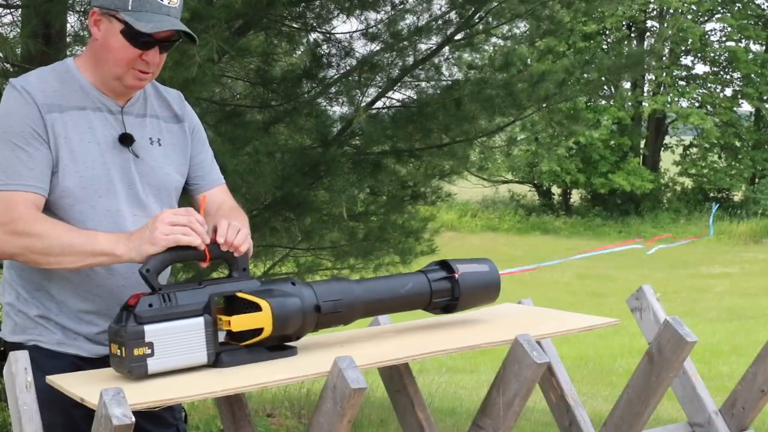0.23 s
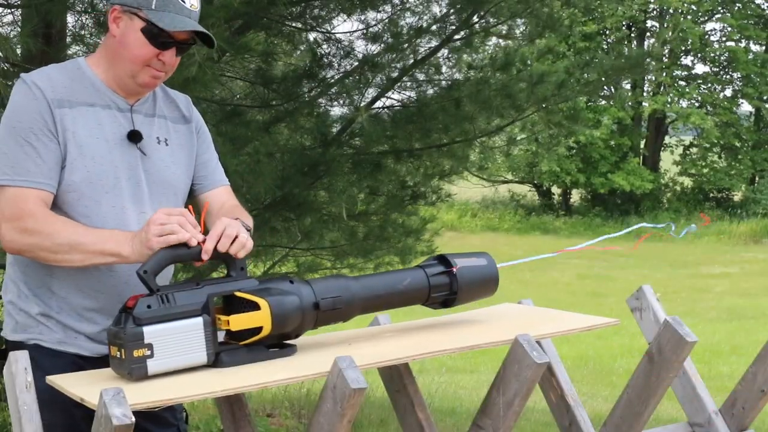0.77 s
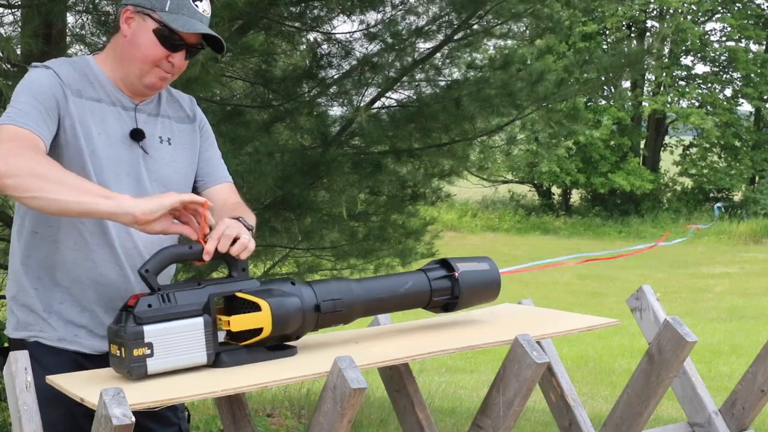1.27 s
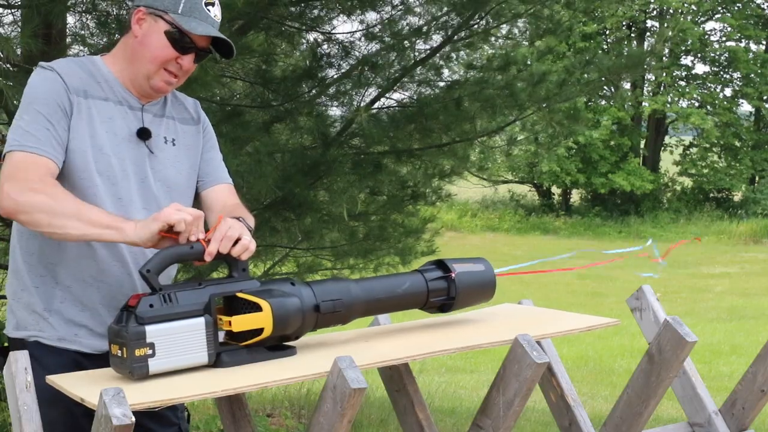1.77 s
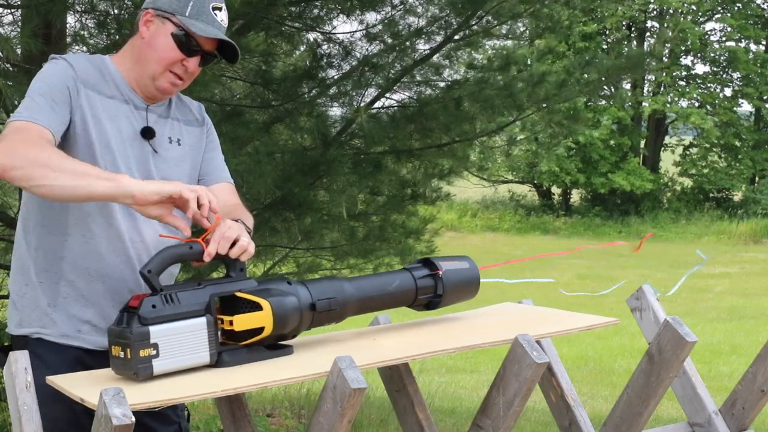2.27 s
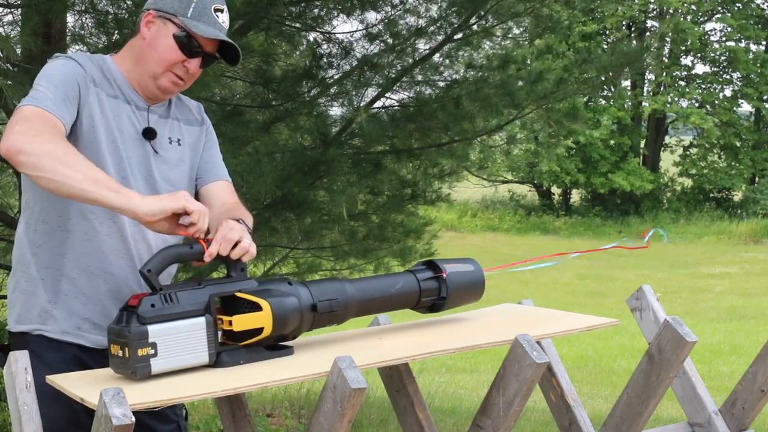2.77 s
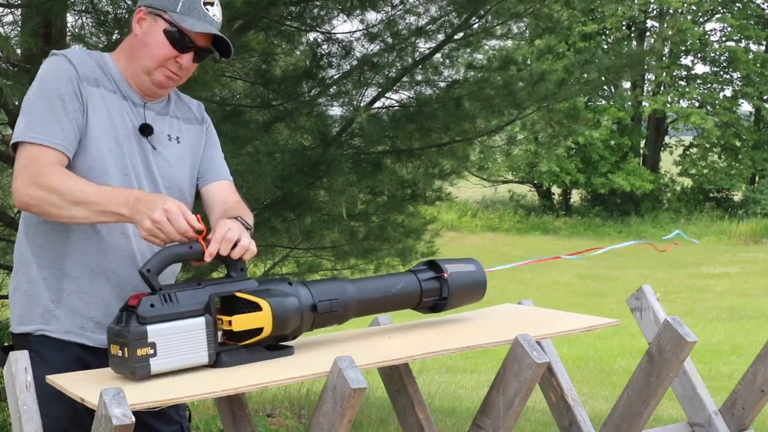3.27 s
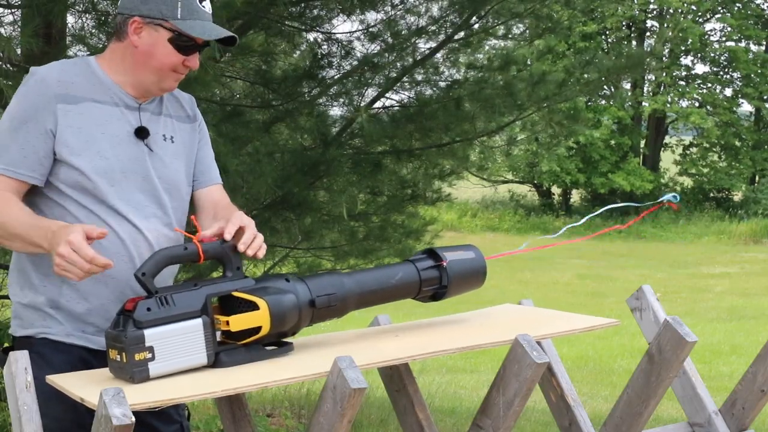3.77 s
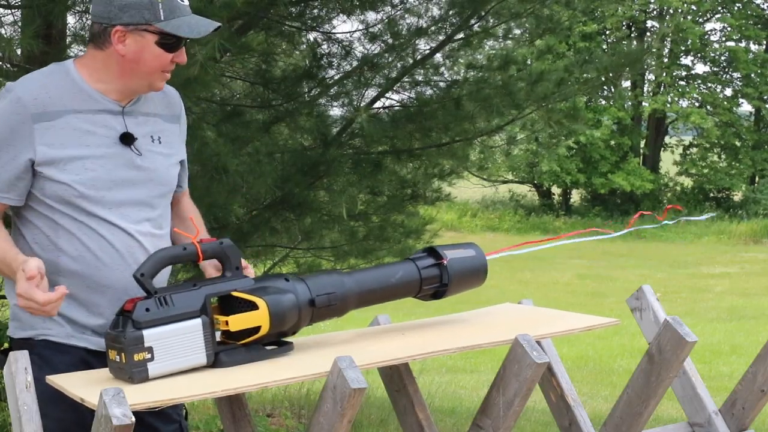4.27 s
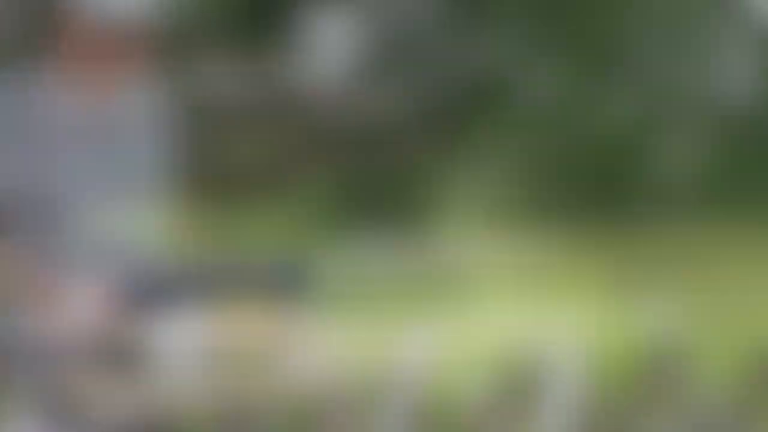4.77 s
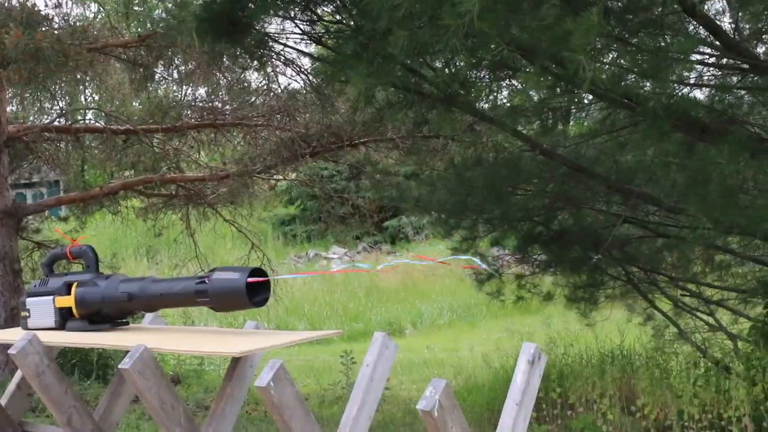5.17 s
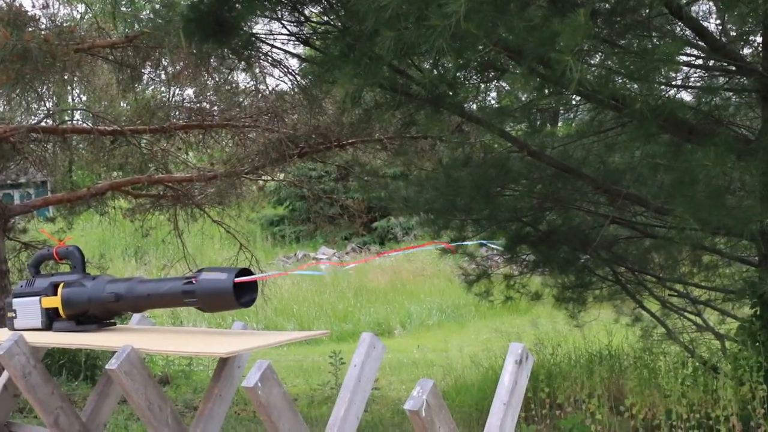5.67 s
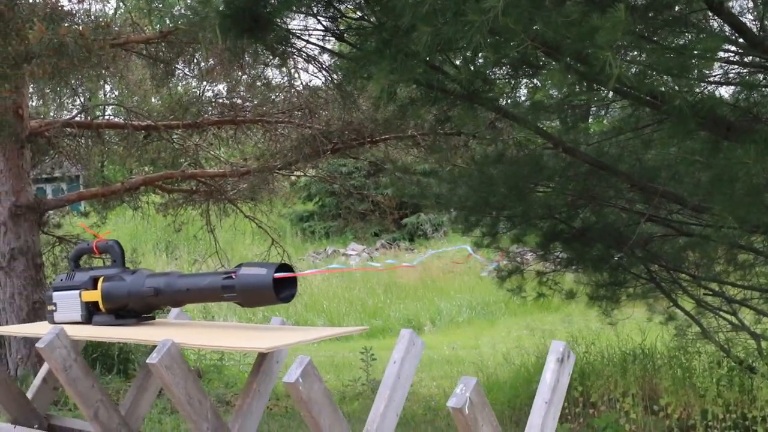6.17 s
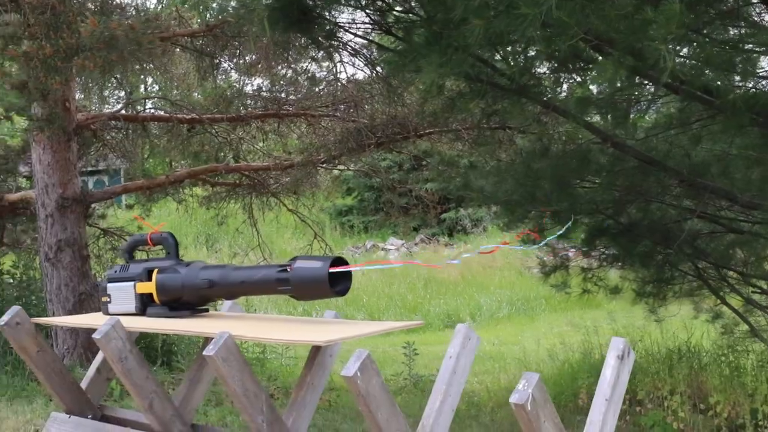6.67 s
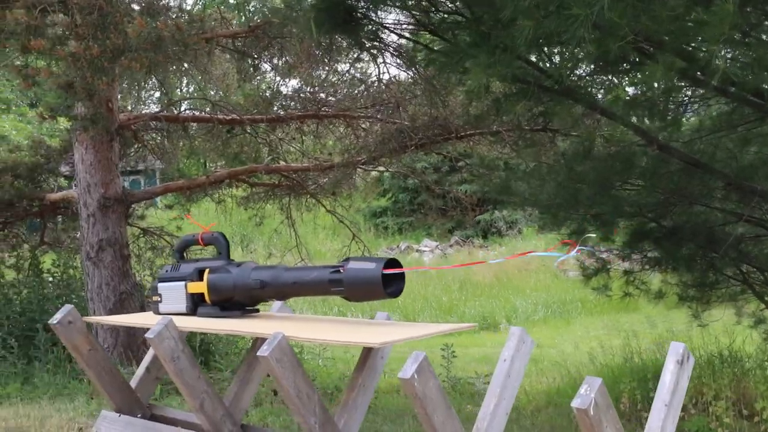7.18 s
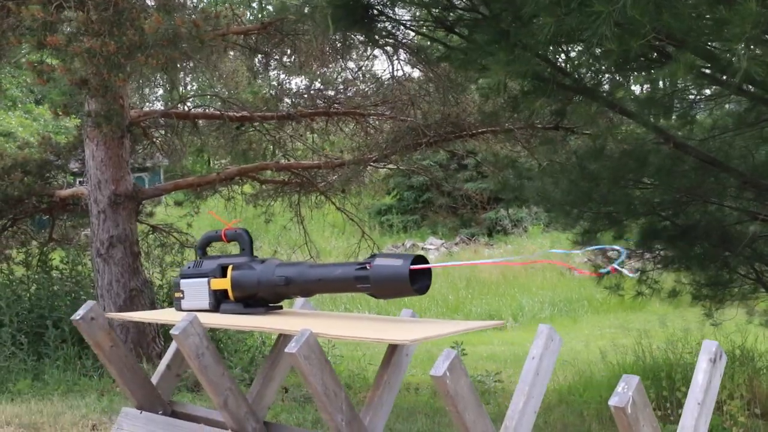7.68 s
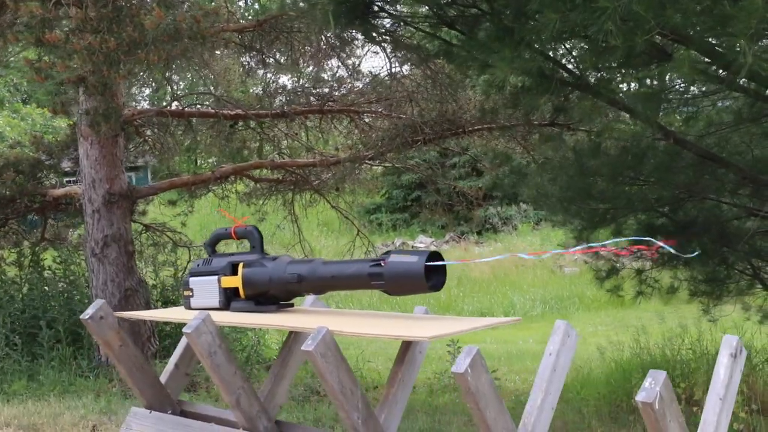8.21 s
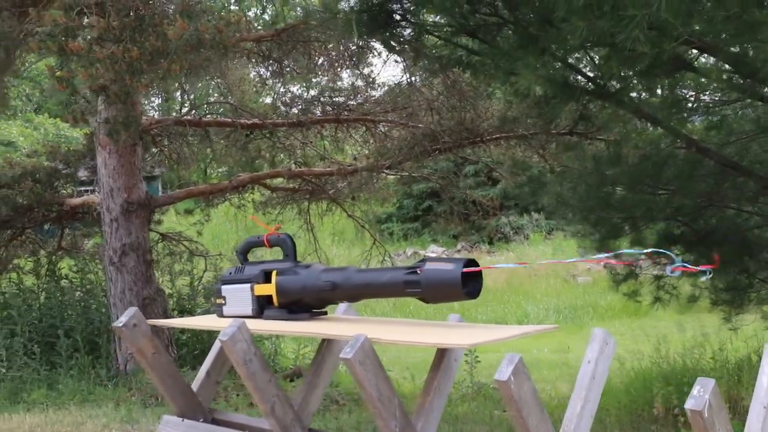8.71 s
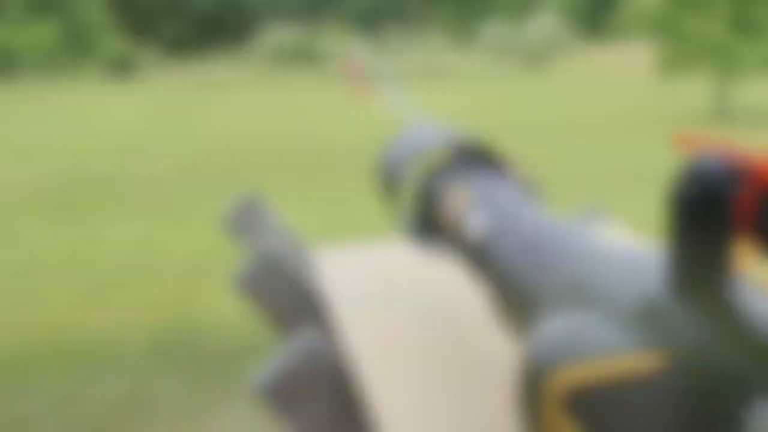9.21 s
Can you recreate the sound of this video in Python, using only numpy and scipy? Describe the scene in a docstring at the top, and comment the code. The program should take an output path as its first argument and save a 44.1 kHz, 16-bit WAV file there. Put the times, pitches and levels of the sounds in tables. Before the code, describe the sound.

A cordless leaf blower runs steadily outdoors, loud and bright up close, then quieter from a few metres away, then stronger again behind the tube.

```python
"""A cordless leaf blower runs at a locked throttle on a board outdoors, heard in mono from three places in turn:
close beside it, a few metres off the nozzle, then just behind the tube. Its air rush is noise shaped by
resonances; its twelve-blade fan and motor are sines on multiples of the shaft speed. A thin edge whistle
joins in the first two places, along with a weak echo of the rush."""
import sys
import numpy as np
from scipy import signal
from scipy.io import wavfile
from scipy.ndimage import uniform_filter1d

SR = 44100
rng = np.random.default_rng(int(sys.argv[2]) if len(sys.argv) > 2 else 0)


def file_out(sig):
    """Save sig as 16-bit WAV at sys.argv[1]."""
    # one column per channel
    cols = np.atleast_2d(sig).T
    # limit, then scale
    lim = np.clip(cols, -1, 1)
    pcm = np.round(lim * 32767).astype(np.int16)
    wavfile.write(sys.argv[1], SR, pcm)


N = 416744


def undb(db):
    """Logarithmic level: 20 dB is a factor of ten in amplitude."""
    return 10 ** (np.asarray(db) / 20)


def curve(table, t):
    """Linear interpolation: every column of a table read at the times t."""
    times, *columns = np.transpose(table)
    return [np.interp(t, times, column) for column in columns]


def wander(t, rate_hz):
    """Low-passed white noise: a smooth random signal of unit spread with its corner near rate_hz."""
    pole = np.exp(-2 * np.pi * rate_hz / SR)
    noise = rng.standard_normal(len(t) + SR)
    y = signal.lfilter([1], [1, -pole], noise)[SR:]  # the first second settles the filter
    y = uniform_filter1d(y, size=48)
    return y / y.std()


def echo(t, x, lag_s, sway, gain):
    """Comb filtering: a weak reflection off a near surface, its path swaying by the share sway."""
    lag = lag_s * (1 + sway * np.sin(t + rng.uniform(0, 2 * np.pi)))
    return x + gain * np.interp(t - lag, t, x)


def whistle(t, start_hz, sink_hz_per_s, level_db, hold_s, fade_db_per_s, waver_hz, flutter):
    """Vortex shedding: air leaving an edge makes a thin wavering tone that sinks, holds, then fades."""
    age = t - t[0]
    frequency_hz = start_hz - sink_hz_per_s * age + waver_hz * wander(t, 11.4)
    angle = 2 * np.pi * np.cumsum(frequency_hz) / SR
    db = level_db - fade_db_per_s * np.maximum(age - hold_s, 0)
    return undb(db) * (1 + flutter * wander(t, 6.2)) * np.sin(angle)


# Narrow lobes and nulls that the microphone drifts through:
# (time [s], whine number [0-3 once rounded], half length [s], added level [dB])
LOBES = [(.1, 0, .43, 6.5), (.68, 0, .08, -4), (1.1, 1, .08, 4), (1.25, 0, 0.29, 5.5), (2.59, 0, .06, 4.5),
         (3.398, 0.5, .07, 8), (3.715, 0, .09, 6), (4.02, 0, 0.16, 8), (4.57, 0, .13, 7), (4.95, 3, .35, 8),
         (5.35, 1, .35, 5), (5.9, 0, .22, -10), (6.2, 3, .22, 9), (6.42, 0, .16, 4.5),
         (6.78, 1, 0.51, 13.5), (6.9, 0.5, .22, -2.5), (7.05, 3, .45, 5), (7.9, 2, .55, 9),
         (7.9, 0, .5, 4.5), (8.037, 1, .2, 10), (8.05, 3, .22, 7), (8.47, 3, .1, -9), (8.8, 2, .25, 11),
         (8.85, 0, 0.15, 5.5), (8.87, 1, .14, 7)]
LOBE_SQUARENESS = 3.1  # exponent of the swell (2 is a bell)


def lobes(t):
    """Directivity: level in dB added to each whine by its lobes and nulls, as smooth flat-topped swells."""
    db = np.zeros((len(WHINE_ORDERS), len(t)))
    for centre_s, which, half_s, added_db in LOBES:
        near = abs(t - centre_s) < 2 * half_s
        distance = abs((t[near] - centre_s) / half_s)
        db[round(which), near] += added_db * np.exp(-distance ** LOBE_SQUARENESS)
    return db


# Faint steady shaft tones: (order [multiples of the shaft speed])
SHAFT_ORDERS = [1, 9, 18, 32, 35]
# Blade passing, its second and third harmonics, the motor: (order [multiples of the shaft speed])
WHINE_ORDERS = [12, 24, 36, 40]
HAZE_SLOPE = 0.66  # haze grows by this power towards the lower whines


def fan(t, speed_hz, whine_db, shaft_db, flutter, haze, flutter_hz, wobble_hz):
    """Blade-passing radiation: tones locked to the shaft, shaken in size and phase by eddies in the blades."""
    angle = 2 * np.pi * np.cumsum(speed_hz + wobble_hz * wander(t, 4.3)) / SR
    out = 0
    for order, db in zip(WHINE_ORDERS, whine_db):
        # flutter and haze apply in full to the lowest whine and weaken for the higher ones
        lowness = WHINE_ORDERS[0] / order
        big_eddies = flutter * lowness ** 0.62
        small_eddies = haze * lowness ** HAZE_SLOPE
        swell = big_eddies * wander(t, flutter_hz) + small_eddies * wander(t, 49)
        sway = big_eddies * wander(t, flutter_hz) + small_eddies * wander(t, 49)
        tone = (1 + swell) * np.sin(order * angle) + sway * np.cos(order * angle)
        out = out + undb(db) * tone
    for order, db in zip(SHAFT_ORDERS, shaft_db):
        out = out + undb(db) * np.sin(order * angle + .5 * wander(t, 5.6))
    return np.sqrt(2) * out  # makes the tone levels RMS levels


def rush(t, colour, peaks, moves, level_db, gust_db, glides=0, size=2048):
    """Turbulence noise filtered by resonance: tube and housing peaks change weight as the microphone moves."""
    white = rng.standard_normal(len(t)) * np.sqrt(SR / 2)  # unit power per Hz
    hz, s, air = signal.stft(white, SR, nperseg=size)
    hz, clock = hz[:, None], s + t[0]
    points, density_db = np.transpose(colour)
    db = np.interp(np.log(hz + 1), np.log(points), density_db) + level_db
    # each peak's weights: a resting one, then one for each movement
    pose = np.array([np.ones(len(s))] + [curve(move, clock)[0] for move in moves])
    for (centre, width, *weights_db), glide in zip(peaks, np.resize(glides, len(peaks))):
        bell = np.exp(-((hz - centre - glide * s) / width) ** 2)
        db = db + bell * (np.array(weights_db) @ pose)
    air = signal.istft(air * undb(db), SR, nperseg=size)[1][:len(t)]
    # the jet flaps a little, so the whole rush swells and sinks
    return air * undb(gust_db * wander(t, 8.5))


# Broad colour of the rush before its level trim: (frequency [Hz], density [dB per Hz])
RUSH_BEHIND = [(25, -109.5), (200, -77), (550, -63), (900, -68), (1400, -75), (2500, -69), (5500, -78.5),
               (8000, -78.5), (12000, -84), (15500, -87)]
# Resonances behind the tube: (frequency [Hz], width [Hz], added level [dB])
PEAKS_BEHIND = [(2880, 450, 3.5), (4240, 840, 9.5), (6040, 660, 11)]
# One row per whine, then one per shaft tone: (level [dB])
WHINE_BEHIND_DB = [-35, -44, -62, -46]
SHAFT_BEHIND_DB = [-60, -55, -62, -66, -70]
SPEED_BEHIND_HZ = 361.6  # shaft turns per second


def behind(t):
    """Near field of the tube: hiss and whine are stronger again than on the lawn, without echo or whistle."""
    air = rush(t, RUSH_BEHIND, PEAKS_BEHIND, [], level_db=-0.2, gust_db=0.0)
    tones = fan(t, SPEED_BEHIND_HZ, WHINE_BEHIND_DB, SHAFT_BEHIND_DB,
                flutter=0.18, haze=.12, flutter_hz=9, wobble_hz=0.076)
    return air + tones


# Broad colour of the rush before its level trim: (frequency [Hz], density [dB per Hz])
RUSH_LAWN = [(25, -97), (100, -89), (220, -79.5), (370, -71), (700, -68), (900, -68), (1050, -77.5),
             (1400, -78), (3000, -75), (6000, -77), (9500, -81), (12500, -88.5), (15500, -93)]
# Tube resonances and ground-echo notches: (frequency [Hz], width [Hz], glide [Hz per s],
# added level [dB], further level at the end of the walk [dB])
PEAKS_LAWN = [(810, 56, 0, 0, 2), (1140, 48, -4, 6, -1.7), (1850, 59, 0, 0, -6),
              (2220, 106, -39, -1.5, 8.5), (2440, 110, 37, 6, -1.5), (2750, 100, 0, 0.5, 4),
              (3454, 210, 25, 8.5, 0.5), (4760, 100, 0, 4, -3), (5840, 220, -140, 7.5, -7.2),
              (6970, 490, -170, -5, 4), (7850, 380, -210, 1.5, -6), (8280, 400, 0, -7, 2.5),
              (11190, 280, 0, -0.5, 4)]
# Walk of the microphone: (time [s], share [0-1])
WALK = [(6, 0.055), (8.3, 1)]
# One row per whine before its lobes, then one per shaft tone: (level [dB])
WHINE_LAWN_DB = [-46, -62, -70, -57.5]
SHAFT_LAWN_DB = [-53.5, -49, -69, -66, -69]
SPEED_LAWN_HZ = 363.45  # shaft turns per second


def lawn(t):
    """Far-field radiation a few metres off the nozzle: quieter, with the tube's resonances in front."""
    centre, width, glide, *weights_db = np.transpose(PEAKS_LAWN)
    peaks = np.transpose([centre, width, *weights_db])
    air = rush(t, RUSH_LAWN, peaks, [WALK], level_db=-0.18, gust_db=0.29, glides=glide)
    air = echo(t, air, lag_s=.00252, sway=0.022, gain=0.12)
    whine_db = lobes(t) + np.c_[WHINE_LAWN_DB]
    tones = fan(t, SPEED_LAWN_HZ, whine_db, SHAFT_LAWN_DB,
                flutter=0.19, haze=.12, flutter_hz=6.8, wobble_hz=0.06)
    edge = whistle(t, start_hz=513.4, sink_hz_per_s=4.3, level_db=-43.5, hold_s=3.7,
                   fade_db_per_s=4, waver_hz=6.93, flutter=0.46)
    return air + tones + edge


# Broad colour of the rush before its level trim: (frequency [Hz], density [dB per Hz])
RUSH_BESIDE = [(25, -93), (60, -82.5), (130, -72.5), (220, -70), (280, -61.5), (450, -61.5), (800, -66.5),
               (1300, -75), (2000, -66.5), (4000, -60.5), (8000, -70.5), (12500, -71.5), (15500, -81)]
# Housing resonances and shadows: (frequency [Hz], width [Hz], added level [dB],
# further level when leaning in [dB], further level when turned away [dB])
PEAKS_BESIDE = [(170, 17, 3.5, 2.5, -3.5), (327, 55, 9, -2, -2.5), (870, 73, 0, 6.5, -2.5),
                (1086, 79, 6, -2, -3.5), (1490, 150, 2.3, -3.5, 6.5), (1845, 330, 9, -4, -2.5),
                (2520, 130, 5.5, -3, -2.5), (3720, 540, 2.45, -7, 0), (4200, 370, 2.5, 4.5, -1.5),
                (5080, 340, -0.5, -5, 1), (5600, 540, 5.5, -4.5, 0.5), (7370, 470, 1, -0.8, -5.5),
                (10930, 690, 1.5, 2, -8), (13500, 3000, -0.5, -1, -3)]
# Microphone leaning in, then turning away: (time [s], share [0-1])
LEAN = [(0, 0), (1.1, 0.17), (1.6, 0.7), (2.2, 1), (3.3, 0.92), (3.8, 0.64)]
TURN = [(3.4, 0.036), (4, 0.83)]
# The upper whines leave the intake as one beam: (time [s], level re the beam's centre [dB])
BEAM = [(0, 0), (.5, -6), (1.05, -4), (2.55, 0), (3.4, -2.5), (4.05, -7.5), (4.3, -27), (4.75, -13)]
# One row per whine before its lobes: (level in the beam's centre [dB], share of the beam's fall-off [0-1])
WHINE_BESIDE = [(-31.3, 0), (-32.5, .72), (-32, 1), (-42.3, .6)]
# One row per shaft tone: (level [dB])
SHAFT_BESIDE_DB = [-47.5, -47, -64, -66, -64]
# shaft turns per second, easing down as the battery sags
START_HZ, SETTLED_HZ, SETTLE_S = 373.3, 370.8, 1.9


def beside(t):
    """Near field at arm's length from the intake: bright hiss, a hollow housing note and a beamed whine."""
    air = rush(t, RUSH_BESIDE, PEAKS_BESIDE, [LEAN, TURN], level_db=0.17, gust_db=0.51)
    air = echo(t, air, lag_s=0.001717, sway=0.1, gain=0.079)
    speed_hz = SETTLED_HZ + (START_HZ - SETTLED_HZ) * np.exp(-t / SETTLE_S)
    beam_db = curve(BEAM, t)[0]
    whine_db = lobes(t) + [db + share * beam_db for db, share in WHINE_BESIDE]
    tones = fan(t, speed_hz, whine_db, SHAFT_BESIDE_DB,
                flutter=0.35, haze=0.16, flutter_hz=15, wobble_hz=0.051)
    edge = whistle(t, start_hz=689, sink_hz_per_s=27, level_db=-38.5, hold_s=1.87,
                   fade_db_per_s=8, waver_hz=5.87, flutter=0.18)
    return air + tones + edge


# The two cross-fades: (time [s], share of the next place [0-1]); a trace of the other place can remain
TO_LAWN = [(4.64, 0), (4.78, 0.2), (4.9, 0.99)]
TO_BEHIND = [(9.06, 0.017), (9.2, 0.56), (9.35, 0.97)]


def scene():
    """Linear superposition: the three places cross-fade, and both channels carry the same sound."""
    t = np.arange(N) / SR
    away = np.clip(curve(TO_LAWN, t)[0], 0, 1)
    back = np.clip(curve(TO_BEHIND, t)[0], 0, 1)
    out = np.zeros(N)
    for place, share in (beside, 1 - away), (lawn, away * (1 - back)), (behind, back):
        heard = share > 0
        out[heard] += share[heard] * place(t[heard])
    return np.array([out, out])


def record(dry):
    """Band limiting: a high-pass drops the deepest rumble and a steep low-pass cuts the top."""
    high_pass = signal.butter(2, 18, "high", fs=SR, output="sos")
    low_pass = signal.ellip(12, .1, 80, 15750, fs=SR, output="sos")  # ripple and stop-band depth in dB
    return signal.sosfilt(low_pass, signal.sosfilt(high_pass, dry))


dry = scene()
out = record(dry)
file_out(out)
```